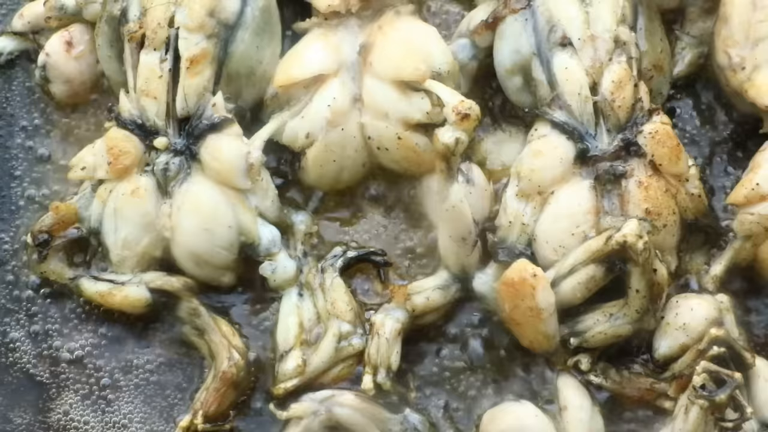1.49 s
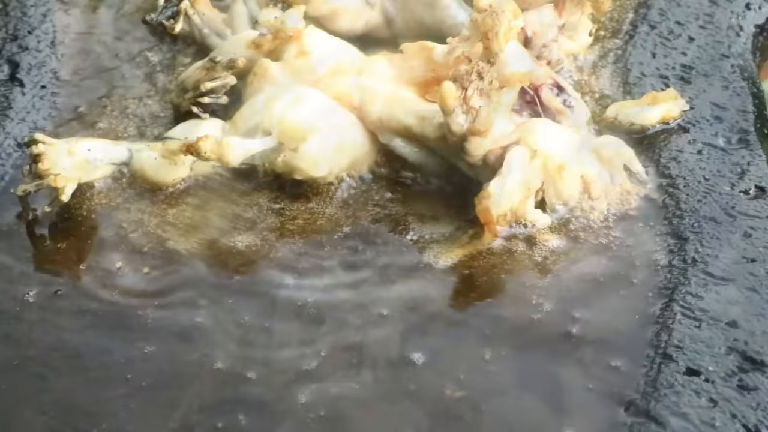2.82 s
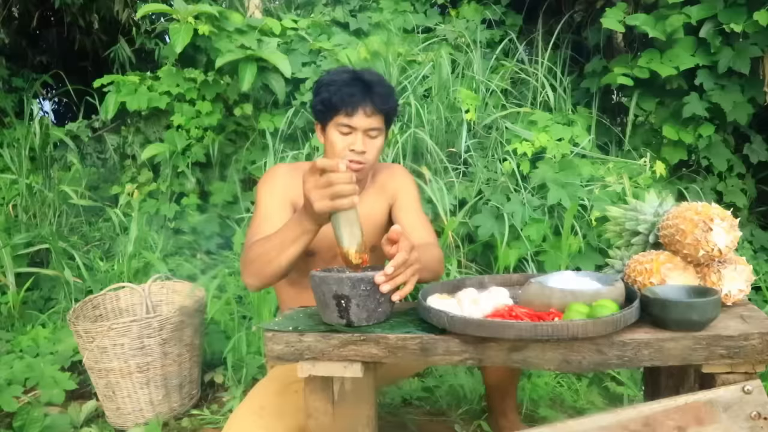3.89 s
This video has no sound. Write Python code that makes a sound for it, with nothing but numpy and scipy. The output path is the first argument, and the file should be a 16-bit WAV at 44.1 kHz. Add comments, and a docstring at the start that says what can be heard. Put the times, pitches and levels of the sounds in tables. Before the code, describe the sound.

A steady sizzle of meat frying in fat runs from the start, dotted with small spits and pops, over a very faint low flutter of flames. Its tone shifts at about 1.6 and 4 seconds. A stone pestle knocks in a stone mortar, lightly at 0.2 seconds, more firmly at 0.5 and 0.8, and softly at 1.3. The flames swell gently from 1.6 to 2.8 seconds. Hard, sharp, briefly ringing blows land at 1.7, 2.3, 2.6 and 3 seconds, with weaker knocks between; the hardest overload the microphone. The blows carry a dull wooden thud and a slight wet squelch. Lighter knocks follow, clearest at 3.9 and 5.2 seconds, with a last soft tap near 5.5. Wet stone squeaks or scrapes briefly around 2, 3.7 and 5.1 seconds. The setting is outdoors, with a faint echo from trees.

```python
"""A steady sizzle is heard first: bubbles burst in the fat of meat on a hot slab over a wood fire.
Flames flutter and flare up once, and big drops spit; the frying is heard from three places in turn.
A stone pestle pounds chillies and garlic in a stone mortar on a wooden table: each impact excites
damped modes of bowl, pestle and plank, and wet stone squeaks as it slides.
The hardest blows overload the microphone, and the trees return a faint echo."""
import sys
import numpy as np
from scipy import signal
from scipy.fft import rfft, irfft, next_fast_len
from scipy.io import wavfile
from scipy.ndimage import map_coordinates

SR = 44100
rng = np.random.default_rng(int(sys.argv[2]) if len(sys.argv) > 2 else 0)


def generate_wav(signal):
    """Clip the signal to [-1, 1] and save it as 16-bit WAV at the path in sys.argv[1]."""
    frames = np.transpose(np.atleast_2d(signal))
    scaled = np.clip(frames, -1, 1) * 32767
    pcm = np.round(scaled).astype(np.int16)
    wavfile.write(sys.argv[1], SR, pcm)


N = 250929

# spectrum of the sizzle at each listening place: frequency_hz, gain_db
FAT_FIRST = [(180, -55), (300, -18), (478, -14), (565, -11), (749, -13.5), (842, -9), (1580, -7),
             (2170, -3.5), (3290, -7.5), (3760, -3), (5080, 0), (6740, -4.5), (8640, -24), (11100, -26),
             (16000, -41)]
FAT_SECOND = [(150, -30), (300, -14), (570, -10), (780, -12), (1200, -8), (1620, -1), (2200, -8),
              (3000, -6.5), (4000, -4.5), (5300, -7), (6800, -10.5), (8200, -25), (12000, -31),
              (16000, -42)]
FAT_THIRD = [(180, -84), (300, -26), (366, -9.5), (418, -33), (440, -13.5), (828, -13), (915, -12.5),
             (1810, -4), (4160, -5), (5160, -1.5), (7690, -10.5), (8940, -22.5), (16000, -28)]
# listening places: spectrum, steam_db, clumping_db, level_db, drift_db_per_s,
# small_spits_per_s, small_spit_pitch_hz
PLACES = [(FAT_FIRST, 0.37, 0.55, -35.5, -1.3, 4, 4240), (FAT_SECOND, -6, 3.4, -34.5, -0.92, 8, 1670),
          (FAT_THIRD, -4.5, 1.8, -36, -0.1, 7.6, 2410)]
# moves to the next listening place: time_s
MOVES = [1.56, 3.96]
# spectrum of the flames: frequency_hz, gain_db
FLAME_SPECTRUM = [(15, -42.5), (25, -6), (49, -2.5), (92, 5), (260, 2.5), (387, -9.5), (554, -12),
                  (600, -2), (780, -30), (1320, -120)]
# soft low bumps: centre_s, level_db, pitch_hz, half_length_s
LOW_BUMPS = [(2.01, -22, 150, 0.0048), (2.05, -37, 87, 0.04), (2.204, -32, 150, 0.004)]
# pestle blows: start_s, force_db, hardness_db_per_octave, lean_db, clack_db, clack_hz, thud_db
BLOWS = [(0.231, -30, -7, -4, -47, 890, -31), (0.5006, -14, -14, 8, -13.5, 840, -33),
         (0.7848, -9, -8.5, -5, -9, 833, -30.5), (1.323, -29, -10, 3, -40, 800, -35),
         (1.741, -2.5, 3.5, 4.5, 3.5, 1486, -22.5), (2.038, -24, -14, 10, -19.5, 845, -22),
         (2.3102, 3, 3, 3.5, 15, 1594, -16.5), (2.6035, 3.5, 0.5, 0, 15, 1658, -18),
         (2.8498, -16, -9, 12, -4, 1680, -38), (2.878, -14.5, -3, -9, -16, 1670, -30.5),
         (3.032, 1.5, -4.5, 2, 0.5, 1595, -34), (3.579, -26.5, -16, -7, -32, 800, -38),
         (3.8502, -9, 1, -12, -3.5, 1824, -34), (4.663, -51, 10, 5, -34, 1130, -35),
         (4.924, -49.5, -5, -3, -36, 992, -36), (5.1856, -27, 9.5, 5, -4.5, 1164, -21.5),
         (5.46, -24.5, -20, -10, -33.5, 1180, -26)]
# modes of the mortar: pitch_hz, level_db, t60_s, rise_s, wall_share (0-1)
MORTAR_MODES = [(357, -16, 0.028, 0.0025, 0), (565.7, -0.5, 0.054, 0.0042, 0),
                (756, -14, 0.053, 0.0015, 0.2), (920, 5.5, 0.014, 0.0021, 0), (1034, 0, 0.028, 0.0028, 1),
                (1173, 3, 0.0077, 0.00028, 0.35), (1554, -14, 0.046, 0.00045, 0),
                (1698, 1.5, 0.021, 0.00061, 0.03), (1850, -8, 0.0053, 0.00012, 0.6),
                (2220, -6, 0.018, .0002, 0.1), (2880, -15.5, 0.019, 0.0011, 0.66)]
# spectra of stone on stone, the plank, crushed pulp and a bursting drop: frequency_hz, gain_db
CONTACT_SPECTRUM = [(100, -36.5), (350, 5), (600, 3), (1100, -15.5), (1750, 12.5), (2300, -9.5),
                    (4000, -13.5), (7000, -36), (15000, -48)]
PLANK_SPECTRUM = [(25, -43), (60, -18), (115, -1), (170, -2.5), (330, -5.5), (700, -5.5), (3000, -73)]
PULP_SPECTRUM = [(100, -14), (400, -4), (1200, -1), (2400, 0), (4000, -4), (7000, -10), (9000, -25),
                 (15000, -38)]
SNAP_SPECTRUM = [(200, -14), (1200, -3), (5000, 0), (7000, -3), (9000, -17), (15000, -28)]
# decay of sound scattered by ground and trees: frequency_hz, t60_s
TREE_DECAY = [(150, 0.16), (600, 0.23), (1700, 0.093), (4000, 0.31), (12000, 0.19)]
# the biggest spits of fat: start_s, relative_cavity_db, pitch_hz, relative_snap_db
BIG_SPITS = [(0.2574, -14, 2080, -49), (0.7106, -12.5, 4300, -39), (0.766, -15, 5200, -21.5),
             (1.072, -12, 5300, -37), (1.239, -12, 4100, -38), (1.8535, -29, 1690, -27.5),
             (2.072, -9, 3820, -26), (2.1822, -17.5, 1660, -28), (2.3874, -17, 1780, -22.5),
             (2.4566, -15.5, 1680, -24.5), (2.4999, -12, 4020, -44), (2.6844, -18, 1670, -20.5),
             (2.7003, -11.5, 4370, -43), (2.954, -15.5, 1660, -36), (3.1745, -9, 1490, -39),
             (3.47, -11.5, 3220, -38), (3.6543, -14, 3330, -31), (3.6955, -13.5, 2370, -38),
             (3.9836, -12.5, 4900, -29), (4.0991, -29, 2410, -23.5), (4.3058, -17.5, 2870, -38),
             (4.8313, -20, 2130, -22.5), (4.8974, -16.5, 2320, -32), (5.006, -24, 2350, -28.5),
             (5.3131, -13, 2250, -29.5), (5.462, -15, 2160, -22)]
# the pestle rubs the wet wall: centre_s, level_db, pitch_hz, half_length_s, skirt_db_per_octave
RUBS = [(2.031, -17.5, 1700, 0.0028, 46), (2.069, -35, 1640, 0.015, 33), (3.743, -25.5, 1350, 0.0027, 11.5),
        (5.045, -34, 860, 0.0085, 7), (5.079, -25.5, 1600, 0.0035, 26), (5.132, -36, 1850, 0.11, 8.5)]

SIMMER_DB, SIMMER_PER_S = 0.8, 2.56  # the sizzle swells and sinks a little
FIRE_DB, FIRE_DRIFT_DB_PER_S = -55, -1.09
FLARE_START_S, FLARE_END_S, FLARE_RISE_S, FLARE_FALL_S, FLARE_DB = 1.564, 2.83, 0.06, 0.071, 10.5
RING_DB, RING_LIMIT_DB = -1.5, -9  # the pestle's ring relative to the force; the most the grip allows
BARE_HARDNESS, CUSHION_DB = 0.9, 7  # hardness of bare stone; ring lost per step of hardness below it
PULP_DB, WETTER_DB_PER_S = -37, 2.5  # the squelch grows as the paste gets wetter
SMALL_SPIT_DB, SMALL_SNAP_DB, SPIT_SPREAD_DB, SPIT_SPREAD_OCTAVES = -22, -32, 2.5, 0.38
SNAP_RISE_S, SNAP_T60_S = 0.00066, 0.0052
BAND_LIMIT_HZ = 16000


def amp(db):
    """Amplitude ratio of a level in decibels."""
    return 10 ** (np.asarray(db) / 20)


def unit(x):
    """Normalisation to rms 1."""
    return x / np.sqrt(np.mean(x ** 2) + 1e-20)


def along(points, hz):
    """Interpolation of (frequency, value) points on a logarithmic frequency axis."""
    frequencies, values = np.transpose(points)
    return np.interp(np.log(hz + 1), np.log(frequencies + 1), values)


def wobble(per_s):
    """Random modulation: a spline through per_s Gaussian values a second."""
    return map_coordinates(rng.standard_normal(1024), [np.arange(N) * per_s / SR], mode="wrap")


def fade(t, t60_s):
    """Exponential damping: 60 dB in t60_s."""
    return np.exp(-np.log(1000) * t / t60_s)


def build_up(t, rise_s):
    """First-order growth towards 1 with time constant rise_s."""
    return 1 - np.exp(-t / rise_s)


def colour(x, spectrum):
    """Minimum-phase filtering: folding the cepstrum gives a causal filter with this spectrum."""
    size = 2 * next_fast_len(len(x) // 2 + 2048)
    gain = amp(along(spectrum, np.fft.rfftfreq(size, 1 / SR)))
    cepstrum = irfft(np.log(gain + 1e-6))
    cepstrum[1:size // 2] *= 2
    cepstrum[size // 2 + 1:] = 0
    return irfft(rfft(x, size) * np.exp(rfft(cepstrum)), size)[:len(x)]


def highpass(x, hz):
    """Second-order attenuation below hz."""
    return signal.sosfilt(signal.butter(2, hz, "high", fs=SR, output="sos"), x)


def add(track, start_s, sound):
    """Superposition of a sound on the track from start_s."""
    i = max(round(start_s * SR), 0)
    track[i:i + len(sound)] += sound[:N - i]


def bubbles(per_s, spread_db, cycles):
    """Tiny bursting bubbles ring as damped oscillators, most weak and a few strong; rms 1."""
    when, pitch, size = rng.random((40000, 3))[:int(per_s * N / SR)].T
    t = np.arange(96) / SR
    hz = 700 * 20 ** pitch[:, None]
    strength = amp(spread_db * np.minimum(-np.log(size + 1e-9), 4.2))[:, None]
    grains = strength * hz * np.sin(2 * np.pi * hz * t) * np.exp(-t * hz / cycles)
    index = (when * N).astype(int)[:, None] + np.arange(len(t))
    return unit(np.bincount(index.ravel(), grains.ravel(), N)[:N])


def sizzle():
    """Shot noise of bubbles bursting in clumps over a hiss of steam, coloured by the listening place."""
    clumps = np.minimum(wobble(per_s=110) + 0.4 * wobble(per_s=14), 2)
    grains = bubbles(per_s=2600, spread_db=5.5, cycles=1.0)
    steam = rng.standard_normal(N)
    out, t = np.zeros(N), np.arange(N) / SR
    place = np.searchsorted(MOVES, t)
    for k, start_s in enumerate([0] + MOVES):
        spectrum, steam_db, clumping_db, level_db, drift_db_per_s = PLACES[k][:5]
        crackle = unit(grains * amp(clumping_db * clumps))
        frying = unit(colour(crackle + amp(steam_db) * steam, spectrum))
        out += (place == k) * amp(level_db + drift_db_per_s * (t - start_s)) * frying
    return out * amp(SIMMER_DB * wobble(SIMMER_PER_S))


def fire():
    """Amplitude-modulated low noise: flames flutter and flare up once, with a few soft bumps."""
    t = np.arange(N) / SR
    ramp = np.minimum((t - FLARE_START_S) / FLARE_RISE_S, (FLARE_END_S - t) / FLARE_FALL_S)
    flame_db = FIRE_DB + FIRE_DRIFT_DB_PER_S * t + FLARE_DB * np.clip(0.5 + ramp, 0, 1)
    roar = colour(rng.standard_normal(N), FLAME_SPECTRUM)
    flutter = amp(0.84 * wobble(per_s=22.07))
    out = amp(flame_db) * unit(roar * flutter)
    for bump in LOW_BUMPS:
        add_swell(out, *bump, skirt_db=15.5)
    return out


def mortar_ring(t, force_db, hardness, lean_db):
    """Modal vibration: hard contact favours the high modes, a slanted blow those of the wall."""
    hz, mode_db, t60_s, rise_s, wall_share = np.transpose(MORTAR_MODES)[:, :, None]
    stray_db, detune = rng.standard_normal((2, len(hz), 1))  # the contact point wanders
    sign = (-1) ** np.arange(len(hz))[:, None]  # neighbouring modes move against each other
    tilt_db = hardness * np.log2(hz / hz[1])
    gain = sign * amp(force_db + mode_db + tilt_db + lean_db * wall_share + stray_db)
    modes = np.sin(2 * np.pi * hz * (1 + 0.01 * detune) * t)
    return np.sum(gain * modes * fade(t, t60_s) * build_up(t, rise_s), 0)


def stone_contact(t, grit_noise, crack_noise, force_db, hardness):
    """A brief impact is broadband: grit and a sharp crack, both growing with hardness."""
    grit = amp(-5 + hardness) * unit(colour(grit_noise, CONTACT_SPECTRUM)) * fade(t, 0.041)
    crack = amp(-35 + 2 * hardness) * crack_noise * fade(t, 0.0019)
    return amp(force_db) * (grit + crack)


def clack(t, level_db, hz):
    """Impact transient: a few strong cycles, lower in pitch when pulp cushions the contact."""
    return amp(level_db) * np.sin(2 * np.pi * hz * t) * fade(t, 0.015) * build_up(t, 0.00049)


def pestle_ring(t, force_db, hardness):
    """Free vibration of one mode: it grows with force, limited by the grip and cushioned by pulp."""
    cushion_db = CUSHION_DB * max(BARE_HARDNESS - hardness, 0)
    ring_db = min(force_db + RING_DB, RING_LIMIT_DB) - cushion_db
    return amp(ring_db) * np.sin(2 * np.pi * 4040 * t) * fade(t, 0.049)


def table_thud(t, noise, level_db):
    """Resonance of the plank: one low mode and a dull shudder build up after the blow."""
    mode = np.sin(2 * np.pi * 213 * t)
    shudder = 0.94 * unit(colour(noise, PLANK_SPECTRUM))
    return amp(level_db) * (mode + shudder) * fade(t, 0.11) * build_up(t, 0.012)


def pulp_squelch(t, noise, spikes, level_db):
    """Rupture noise: skins burst in a spiky little cloud."""
    bursts = unit(colour(noise * amp(2.4 * spikes), PULP_SPECTRUM))
    return highpass(amp(level_db) * bursts * fade(t, 0.096) * build_up(t, 0.00043), hz=150)


def pounding():
    """Impulsive excitation: each blow sounds the stones, thumps the table and crushes pulp."""
    out, t = np.zeros(N), np.arange(SR // 3) / SR
    for start_s, force_db, hardness, lean_db, clack_db, clack_hz, thud_db in BLOWS:
        grit_noise, plank_noise, pulp_noise, spikes, crack_noise = rng.standard_normal((5, len(t)))
        bowl = mortar_ring(t, force_db, hardness, lean_db)
        contact = stone_contact(t, grit_noise, crack_noise, force_db, hardness)
        blow = highpass(bowl + contact + clack(t, clack_db, clack_hz), hz=260)
        blow += pestle_ring(t, force_db, hardness)
        blow += table_thud(t, plank_noise, thud_db)
        blow += pulp_squelch(t, pulp_noise, spikes, PULP_DB + WETTER_DB_PER_S * start_s)
        add(out, start_s, outdoors(blow, scatter_db=-18, echo_db=-33, echo_s=0.043))
    return out


def outdoors(x, scatter_db, echo_db, echo_s):
    """Scattering by ground and leaves, then a diffuse reflection off the trees, follow the direct sound."""
    hz, t, spectra = signal.stft(rng.standard_normal((2, SR // 4)), SR, nperseg=256)
    decay = fade(t, along(TREE_DECAY, hz)[:, None])
    near, far = signal.istft(spectra * decay, SR, nperseg=256)[1]
    near = np.pad(near, (SR // 200, 0))
    far = np.pad(far * fade(np.arange(len(far)) / SR, 0.21), (int(echo_s * SR), 0))
    scatter, echo = (signal.fftconvolve(x, tail / np.linalg.norm(tail))[:len(x)] for tail in (near, far))
    return x + amp(scatter_db) * scatter + amp(echo_db) * echo


def small_spits():
    """A random point process: rows like BIG_SPITS, around the rate and pitch of each listening place."""
    rows, start_s = [], 0
    for gap, size, pitch, snap in rng.standard_normal((80, 4)):
        per_s = PLACES[np.searchsorted(MOVES, start_s)][-2]
        start_s += np.exp(0.5 * gap) / per_s
        hz = PLACES[np.searchsorted(MOVES, start_s)][-1] * 2 ** (SPIT_SPREAD_OCTAVES * pitch)
        cavity_db = SMALL_SPIT_DB + SPIT_SPREAD_DB * size
        rows.append((start_s, cavity_db, hz, SMALL_SNAP_DB + SPIT_SPREAD_DB * snap))
    return [row for row in rows if row[0] < N / SR - 0.01]


def spitting():
    """Cavity resonance: a drop bursts with a sharp snap and rings for a few cycles."""
    out, t = np.zeros(N), np.arange(SR // 16) / SR
    for start_s, cavity_db, hz, snap_db in list(BIG_SPITS) + small_spits():
        cavity = np.sin(2 * np.pi * hz * t) * np.exp(-t * hz / 1.9) * build_up(t, 0.5 / hz)
        rupture = rng.standard_normal(len(t)) * fade(t, SNAP_T60_S) * build_up(t, SNAP_RISE_S)
        snap = colour(rupture, SNAP_SPECTRUM)
        pop = amp(cavity_db + 3.5) * cavity + amp(snap_db + 9.5) * snap / np.abs(snap).max()
        add(out, start_s + 0.001, outdoors(pop, scatter_db=-13, echo_db=-26, echo_s=0.052))
    return out


def add_swell(track, centre_s, level_db, hz, half_s, skirt_db):
    """Band noise under a Gaussian envelope joins the track; it is skirt_db weaker an octave from hz."""
    t = np.arange(-SR // 6, SR // 6) / SR
    spectrum = [(hz * 2.0 ** octave, -skirt_db * fall)
                for octave, fall in [(-2, 2), (-1, 1), (0, 0), (1, 1), (3, 4)]]
    band = colour(rng.standard_normal(len(t)), spectrum)
    envelope = np.exp(-(t / half_s) ** 2 / 2)
    swell = unit(band * envelope) * np.sqrt(np.mean(envelope ** 2))  # rms 1 at its top
    add(track, centre_s - 1 / 6, amp(level_db) * swell)


def rubbing():
    """Sliding friction: wet stone on stone scrapes, or squeaks in a narrow band."""
    out = np.zeros(N)
    for rub in RUBS:
        add_swell(out, *rub)
    return out


def scene():
    """Superposition of mortar, frying and fire at one microphone."""
    return (pounding() + rubbing() + sizzle() + fire() + spitting())[None]


def record(dry):
    """Saturation and band limiting: peaks clip at full scale; deepest bass and top treble are lost."""
    clipped = highpass(np.clip(dry, -1, 1), hz=38)
    size = next_fast_len(N + SR // 2)
    lowpass = 1 / (1 + (np.fft.rfftfreq(size, 1 / SR) / BAND_LIMIT_HZ) ** 100)
    return irfft(rfft(clipped, size) * lowpass, size)[..., :N]


dry = scene()
out = record(dry)
generate_wav(out)
```